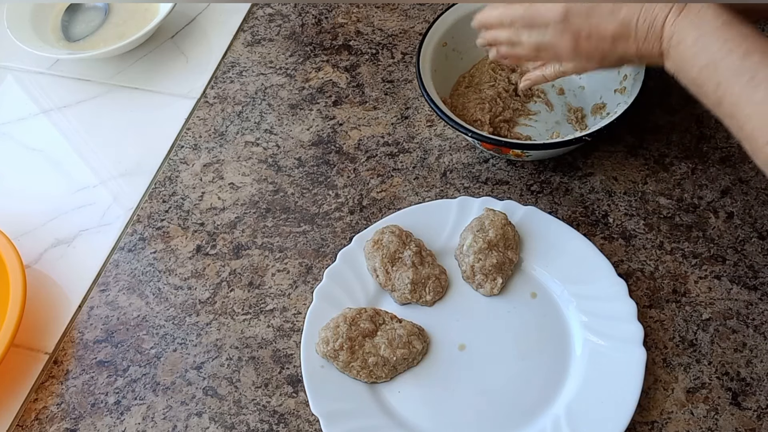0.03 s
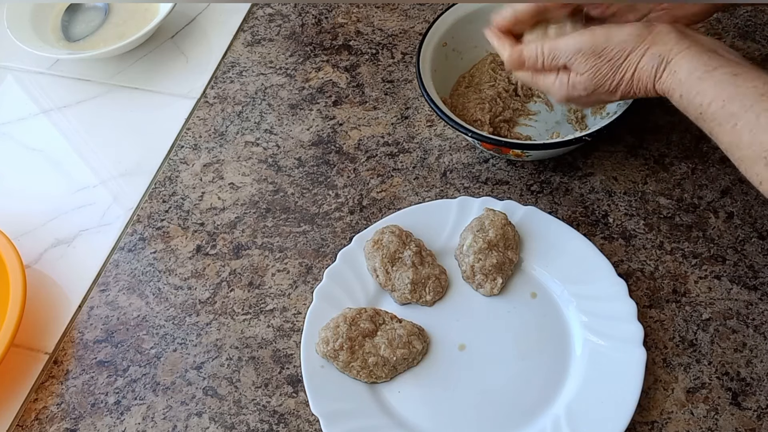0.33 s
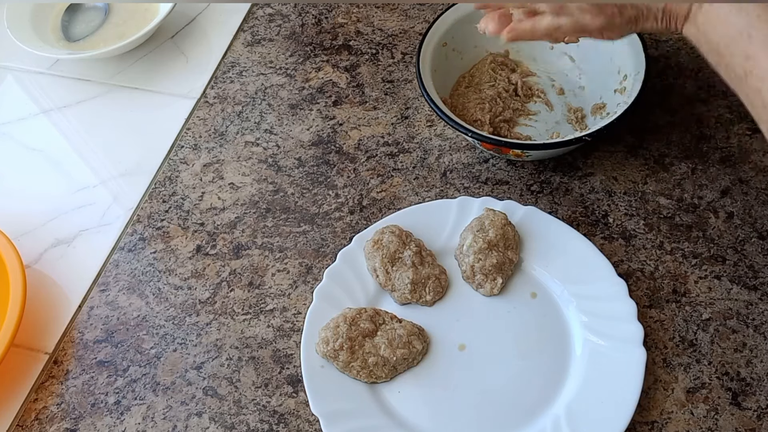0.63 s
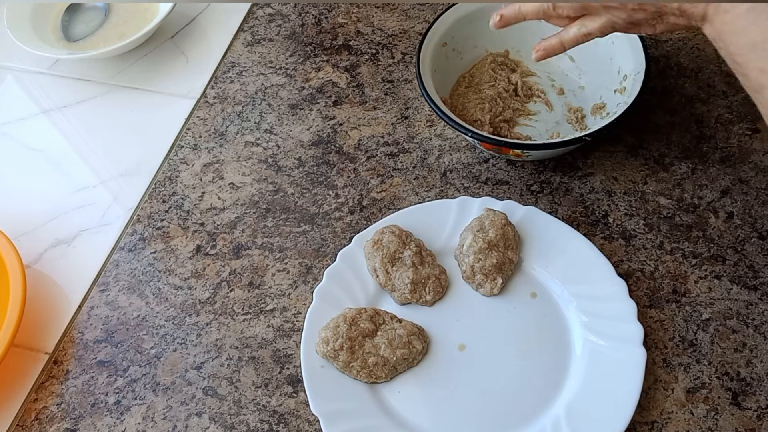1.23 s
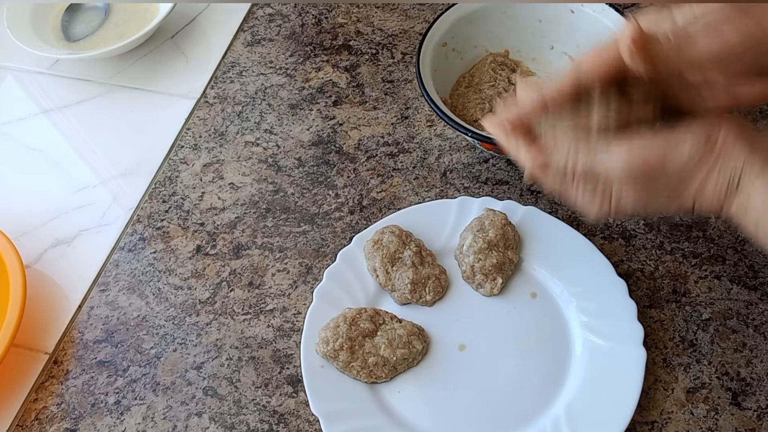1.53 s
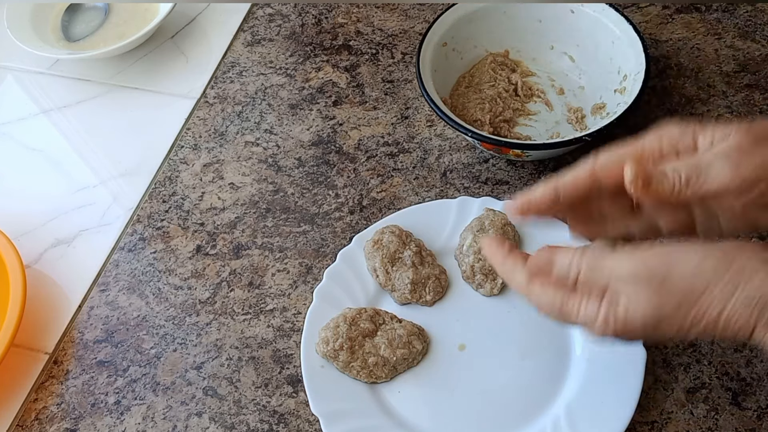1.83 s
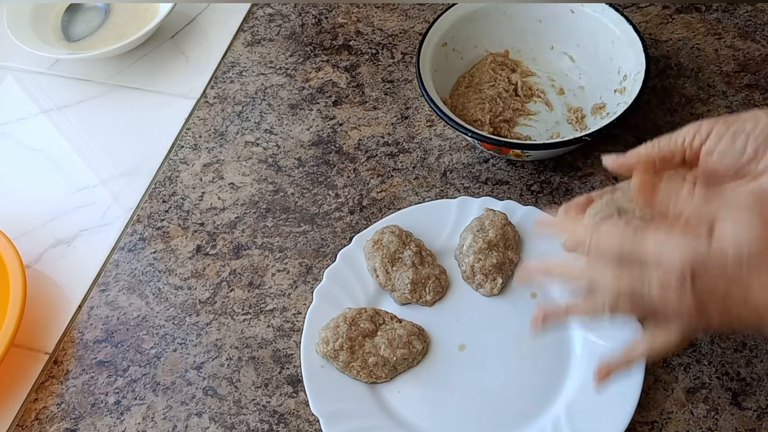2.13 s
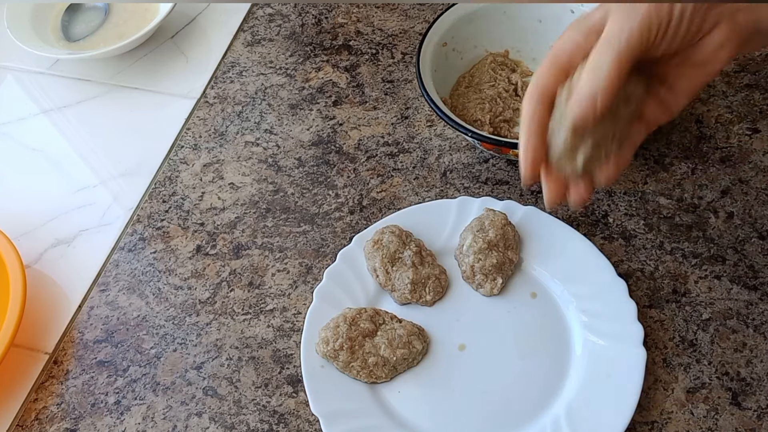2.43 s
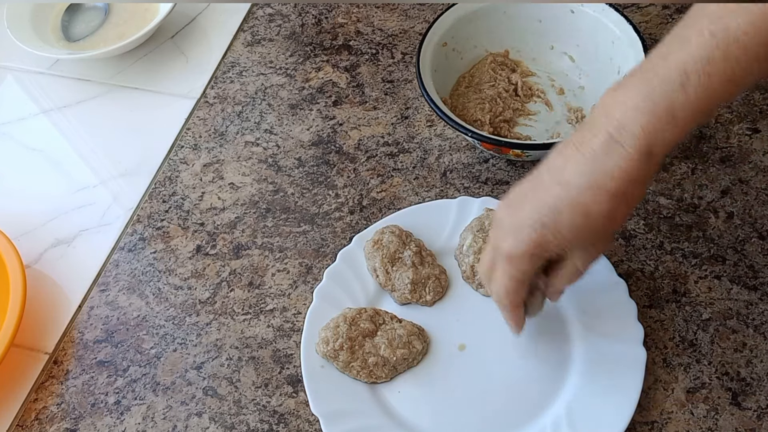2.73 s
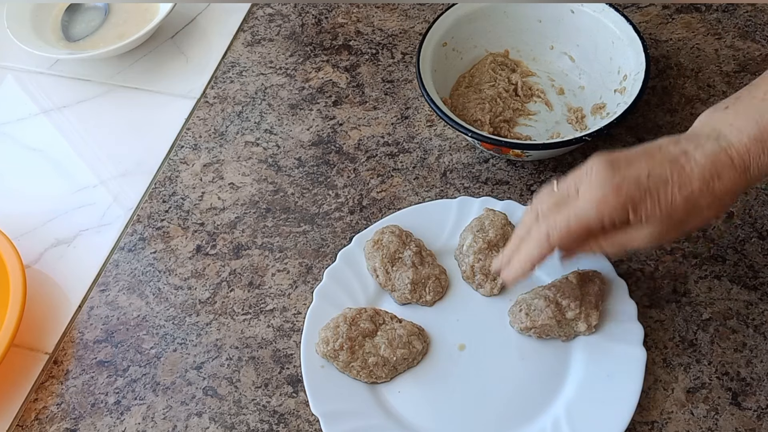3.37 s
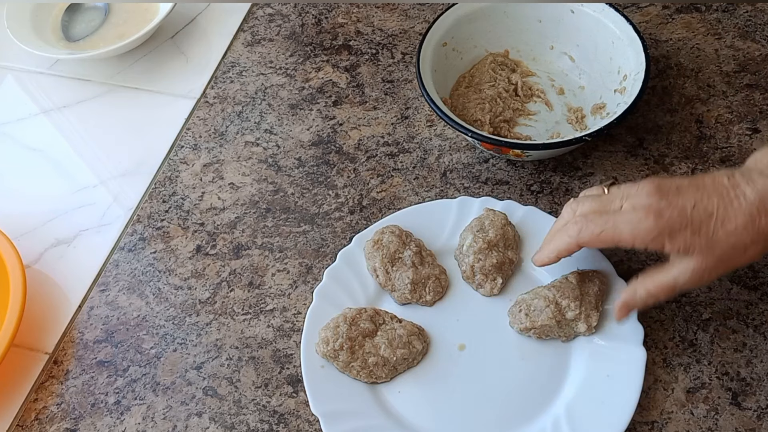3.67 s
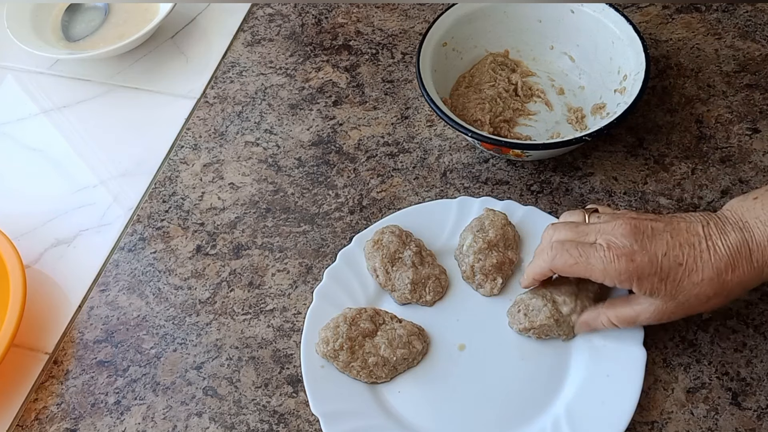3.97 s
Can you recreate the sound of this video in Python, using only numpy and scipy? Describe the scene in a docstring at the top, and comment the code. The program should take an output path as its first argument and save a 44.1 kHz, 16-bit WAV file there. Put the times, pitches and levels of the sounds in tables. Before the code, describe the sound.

Wet ground meat is slapped between hands close by, giving short, irregular smacks with sticky ticks, squelches and a faint fizz for the first two seconds. The sharpest slaps come at about 0.4, 0.9 and 1.6 seconds. Faint squelches follow near 2.5, 3 and 3.5 seconds as the patty is laid on a plate. A fridge-like hum and low rumble continue throughout in the small kitchen.

```python
"""A small kitchen, a stereo pair close to the worktop. From the start a motor, probably a fridge,
hums under a low rumble. For two seconds a patty of wet ground meat is tossed from hand to hand:
each contact gives a short wet crack and pops small air pockets, and between the slaps the sticky
meat ticks, squelches and fizzes on the palms. Then a few faint squelches as it is laid softly
on a plate, while the motor hums on."""
import sys
import numpy as np
from scipy import signal
from scipy.fft import rfft, irfft
from scipy.io import wavfile

SR = 44100
rng = np.random.default_rng(int(sys.argv[2]) if len(sys.argv) > 2 else 0)


def digitize_waveform(pressure):
    """Quantize a signal to 16-bit integers and store it at the path in sys.argv[1].

    Rows of a 2-D input are taken as channels; values are limited to [-1, 1].
    """
    field = np.atleast_2d(pressure).T
    bounded = np.clip(field, -1, 1)
    quanta = np.round(bounded * 32767).astype(np.int16)
    wavfile.write(sys.argv[1], SR, quanta)


N = 176400
TIME = np.arange(N) / SR
BIN_HZ = np.maximum(np.arange(N // 2 + 1) * SR / N, 1)
RIGHT_LAG_S = .00007   # hands and hum reach the right microphone later


def from_db(db):
    """Decibels to gain."""
    return 10 ** (np.asarray(db) / 20)


def rms_one(x):
    """Scale to an rms of 1."""
    return x / np.sqrt(np.mean(x ** 2) + 1e-20)


def per_bin(points):
    """Read a (frequency, value) table at every FFT bin, on a log-frequency axis."""
    hz, value = np.transpose(points)
    return np.interp(np.log(BIN_HZ), np.log(hz), value)


def add(track, start_s, sound):
    """Mix a sound into a track."""
    start = max(int(start_s * SR), 0)
    track[start:start + len(sound)] += sound[:N - start]


def room_noise(gain):
    """Stereo noise of the given spectrum, most alike at the two microphones in the bass; rms 1."""
    # likeness of left and right: (frequency [Hz], correlation)
    likeness = [(30, 0.58), (100, 1), (180, 0.92), (350, 0.86), (700, 0.54), (1400, 0.1), (4000, 0.73),
                (15000, 0.45)]
    alike = np.clip(per_bin(likeness), -1, 1)
    mid, side = rfft(rng.standard_normal((2, N)))
    pair = np.sqrt(1 + alike) * mid + np.sqrt(1 - alike) * side * [[1], [-1]]
    return rms_one(irfft(gain * pair, N))


def room_tone():
    """The steady low rumble of the room and a faint hiss."""
    # noise spectra: (frequency [Hz], relative level [dB])
    rumble_colour = [(25, -20.5), (55, -10.5), (80, -10), (125, 3.5), (165, -3.5), (200, -11), (300, -3),
                     (400, -10.5), (520, -13.5), (620, -15), (800, -24), (1100, -37), (1600, -39.5),
                     (3000, -81)]
    hiss_colour = [(500, 0), (1200, 4), (1700, 8), (2100, 9.5), (2800, 3), (3600, .5), (4800, -.5),
                   (5800, -3), (7200, .3), (10000, 0), (13500, 2.5), (16000, .5)]
    rumble = from_db(-52.5) * room_noise(from_db(per_bin(rumble_colour)))
    hiss = from_db(-76.9) * room_noise(from_db(per_bin(hiss_colour)))
    return rumble + hiss


def motor(hum_hz=100.0, hum_db=-40.5, waver_db=0.63):
    """A clean hum at twice the mains rate, slightly wavering, amid narrow noisy resonances."""
    # resonances of the motor: (frequency [Hz], half-width [Hz], level [dB])
    resonances = [(44, 5.8, -78.5), (85.1, 1.1, -60.5), (133, 6.9, -74), (160.4, 13, -62), (197, 4.3, -73),
                  (228.3, 6.6, -68), (265, 5.7, -65.5), (278.5, 2.6, -70), (323.1, 7.4, -65),
                  (465.7, 7, -64.5), (564.1, 6, -67), (616, 4.7, -83.5), (859, 6, -83), (1584, 60, -86)]
    waver = rms_one(irfft(rfft(rng.standard_normal(N)) / (1 + (BIN_HZ / 2) ** 2), N))
    mic_time = TIME - np.array([[0], [RIGHT_LAG_S]])
    hum = from_db(hum_db + waver_db * waver) * np.sqrt(2) * np.sin(2 * np.pi * hum_hz * mic_time)
    drone = sum(from_db(db) * room_noise(1 / (1 + ((BIN_HZ - hz) / width) ** 2))
                for hz, width, db in resonances)
    return hum + drone


def kitchen(sound, bounce_s=.0057, bounce_db=-10, near_t60_s=.06, near_db=-3.5, tail_band_db=-1.5):
    """At each microphone: direct sound, near scatter, a worktop bounce, a tail whose treble dies first."""
    # reverberation of the room: (band centre [Hz], time to fall 60 dB [s])
    decay_times = [(1000, 0.46), (3000, 0.37), (6000, 0.26), (10000, 0.23), (15000, 0.21)]
    t = TIME[:SR // 2]
    near = from_db(-60 * t / near_t60_s) * (t > .0005)
    response = from_db(near_db) * near / np.linalg.norm(near) * rng.standard_normal((2, len(t)))
    for mic, lag_s in enumerate((0, RIGHT_LAG_S)):
        response[mic, int(lag_s * SR)] += 1
        response[mic, int((lag_s + bounce_s) * SR)] += from_db(bounce_db)
    white = rfft(rng.standard_normal((2, N)))
    centres = [hz for hz, _ in decay_times]
    for share, (_, t60) in zip(np.eye(len(centres)), decay_times):
        band = irfft(white * per_bin(list(zip(centres, share))), N)[:, :len(t)]
        fall = from_db(-60 * t / t60) * (t > bounce_s)
        response += from_db(tail_band_db) * fall / np.linalg.norm(fall) * band
    return signal.fftconvolve(sound[None], response, axes=1)[:, :N]


def crackle(clicks_per_s=2800, spread_db=4.5):
    """Dense tiny clicks of uneven size from a tearing wet film; rms 1."""
    sizes = from_db(spread_db * np.minimum(rng.exponential(1, N), 5))
    signs = rng.choice([-1, 1], N)
    return rms_one(sizes * signs * (rng.random(N) < clicks_per_s / SR))


def slides(attack_s=0.028):
    """Meat slides and peels on the palm: a bright fizz that swells, then fades as it comes to rest."""
    # slides on the palm: (time [s], length [s], peak level [dB])
    strokes = [(0.19, 0.079, -82), (0.46, 0.45, -80), (0.775, 0.24, -76), (1.13, 0.27, -72),
               (1.458, 0.22, -80.5), (1.904, 0.36, -74.5)]
    # spectrum of the fizz: (frequency [Hz], relative level [dB])
    colour = [(1500, -28), (4000, -6), (5800, 0), (7500, 4), (10000, -3), (13000, -0.5), (16000, -1.5)]
    envelope = np.zeros(N)
    for start_s, length_s, db in strokes:
        ramp = np.interp(TIME - start_s, [0, min(attack_s, length_s / 2), length_s], [0, 1, 0])
        envelope += from_db(db) * np.sin(np.pi / 2 * ramp)
    fizz = irfft(rfft(crackle()) * from_db(per_bin(colour)), N)
    return envelope * rms_one(fizz)


def squelches(q=3.8, attack_s=0.0006):
    """Air squeezed out through the wet meat rings a small cavity: a quick rise, then a fade."""
    # escapes of air: (time [s], fade time [s], pitch [Hz], level [dB])
    escapes = [(0.003, 0.024, 1790, -65.5), (0.01, 0.015, 3400, -71), (0.039, 0.013, 5740, -70.5),
               (0.618, 0.014, 5860, -67), (0.875, 0.012, 4400, -67), (1.145, 0.033, 8000, -71),
               (1.228, 0.015, 5200, -75), (1.423, 0.083, 2480, -78), (1.526, 0.048, 4360, -72),
               (1.603, 0.028, 2040, -64.5), (1.64, 0.095, 1650, -76), (1.896, 0.036, 1790, -70),
               (1.926, 0.014, 3000, -76.5), (2.48, 0.047, 2050, -78), (2.48, 0.056, 2950, -80.5),
               (2.98, .035, 4480, -77), (3.47, 0.036, 2900, -83)]
    out, t = np.zeros(N), TIME[:SR // 4]
    edge_ratio = np.exp(.5 / q)
    for start_s, fade_s, hz, db in escapes:
        air = rng.standard_normal(len(t))
        cavity = signal.butter(1, [hz / edge_ratio, hz * edge_ratio], "band", fs=SR, output="sos")
        ring = rms_one(signal.sosfilt(cavity, signal.sosfilt(cavity, air)))
        envelope = (1 - np.exp(-t / attack_s)) * np.exp(-t / fade_s)
        add(out, start_s, from_db(db) * ring * envelope)
    return out


def smacks(crack_s=0.0006, top_hz=13500, squish_s=0.012, squish_db=-17):
    """Each contact rings an air pocket, damped by the meat, and gives a crack that trails off in crackle."""
    # wet contacts of meat and hand: (time [s], pocket pitch [Hz], rise to its peak [cycles],
    # pocket level [dB], crack level before filtering [dB], low edge of the crack [Hz])
    contacts = [(0.002, 1960, 1.7, -56, -55, 1900), (0.31, 8450, 1.7, -47, -56, 5000),
                (0.328, 5970, 1.8, -56.5, -62, 5000), (0.3538, 9800, 1.4, -42, -40, 3500),
                (0.3563, 1810, 3.1, -44.5, -52, 1900), (0.3571, 3690, 3.2, -40, -50, 1900),
                (0.3559, 2700, 2.6, -46, -64, 1900), (0.3624, 3130, 1.7, -43, -66, 1900),
                (0.363, 2000, 3.3, -48, -67, 1900), (0.511, 7200, 2.5, -55.5, -65, 5000),
                (0.523, 7600, 2.5, -62, -69, 5000), (0.5578, 7500, 1.7, -56, -58, 4500),
                (0.6185, 6360, 2.1, -53, -68, 4500), (0.7735, 6550, 2.2, -52, -73, 4950),
                (0.782, 13600, 1.5, -60, -58, 9000), (0.834, 5900, 2.3, -45.5, -51, 6500),
                (0.8719, 5500, 2, -38, -42, 5000), (0.8762, 5300, 0.89, -45, -37.5, 6400),
                (0.8799, 2080, 1, -55.5, -49, 2500), (1.2302, 5160, 4.7, -56, -69, 4500),
                (1.4814, 7200, 2.4, -50, -53.5, 5000), (1.5056, 8700, 2.3, -51, -53.5, 4970),
                (1.54, 11700, 2.3, -63, -61, 6000), (1.554, 3900, 3.4, -51.5, -52, 3500),
                (1.6009, 2280, 2.2, -54.5, -50, 1000), (1.6015, 4680, 1.7, -45, -42, 4500),
                (1.603, 940, 0.89, -57, -68, 1000), (1.9042, 1680, 3.8, -59, -79, 1900),
                (1.9083, 13000, 1.2, -52, -54, 9000), (1.9247, 1810, 3, -55.5, -67, 4000),
                (1.9613, 4630, 2.3, -57, -48.5, 5630)]
    out, t = np.zeros(N), TIME[:SR // 10]
    clicks = crackle()
    fall = np.exp(-t / crack_s)
    for start_s, hz, cycles, pocket_db, crack_db, low_hz in contacts:
        age = t * hz / cycles   # 1 at the pocket's peak
        pocket = (age * np.exp(1 - age)) ** 2 * np.sin(2 * np.pi * hz * t)
        burst = rms_one(fall * rng.standard_normal(len(t))) * np.sqrt(np.mean(fall ** 2))
        squish = from_db(squish_db) * np.exp(-t / squish_s) * clicks[int(start_s * SR):][:len(t)]
        band = signal.butter(2, [low_hz, top_hz], "band", fs=SR, output="sos")
        crack = signal.sosfilt(band, burst + squish)
        add(out, start_s, from_db(pocket_db) * pocket + from_db(crack_db) * crack)
    return out


def scene():
    """Hands and meat close up in the kitchen, the motor and the room tone behind them."""
    return kitchen(smacks() + squelches() + slides()) + motor() + room_tone()


def record(dry, cutoff_hz=15720):
    """The two microphones differ a little in colour; the top is cut steeply."""
    # balance of the pair: (frequency [Hz], left minus right [dB])
    balance = [(100, -1), (180, 4.5), (350, -2.1), (650, 3.5), (1300, -1.5), (2500, 1.3), (5000, 0.5),
               (10000, 0), (15000, -0.3)]
    tilt = from_db(per_bin(balance) * [[1], [-1]] / 2)
    low_pass = 1 / np.sqrt(1 + (BIN_HZ / cutoff_hz) ** 700)
    return irfft(rfft(dry) * tilt * low_pass, N)


dry = scene()
out = record(dry)
digitize_waveform(out)
```